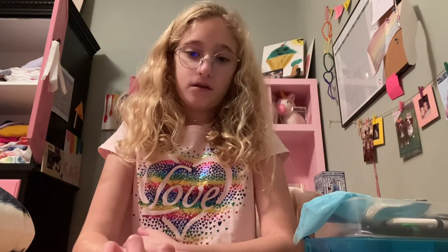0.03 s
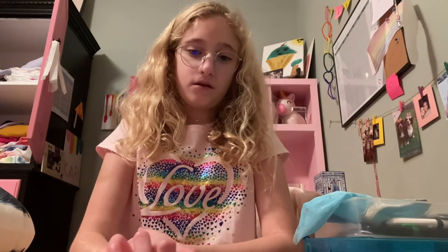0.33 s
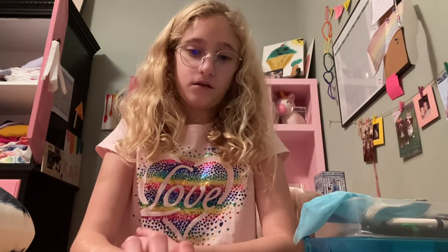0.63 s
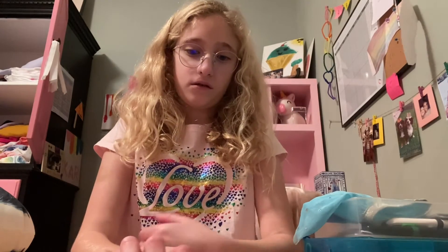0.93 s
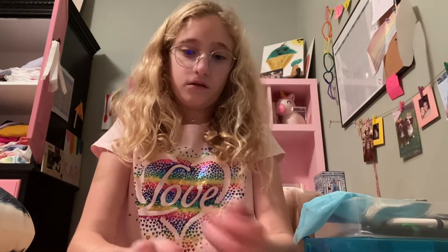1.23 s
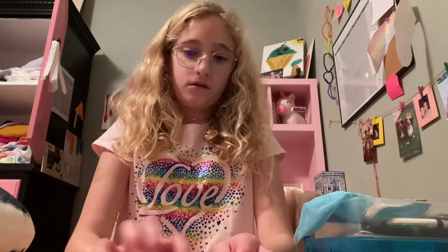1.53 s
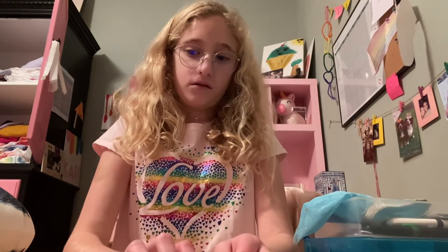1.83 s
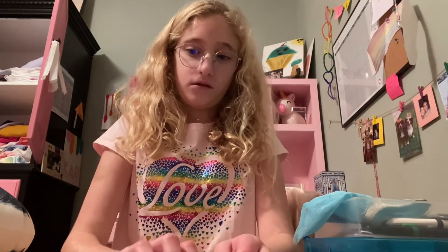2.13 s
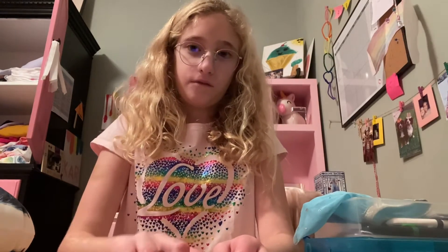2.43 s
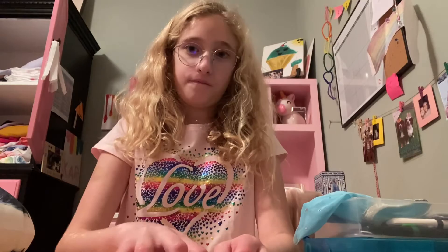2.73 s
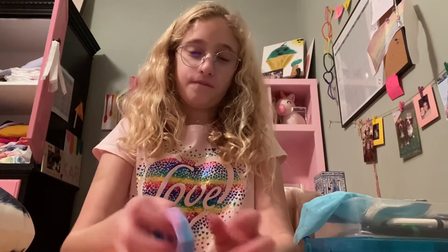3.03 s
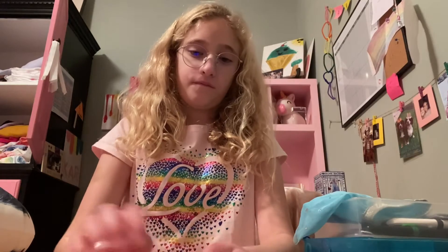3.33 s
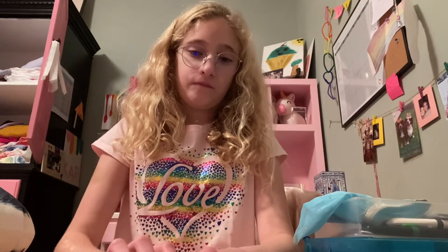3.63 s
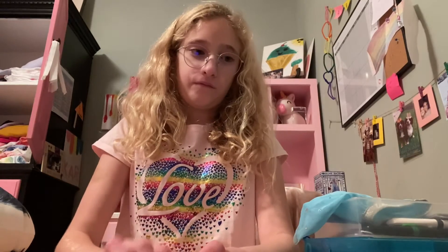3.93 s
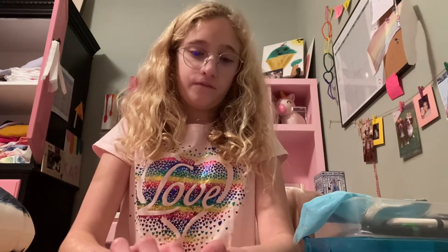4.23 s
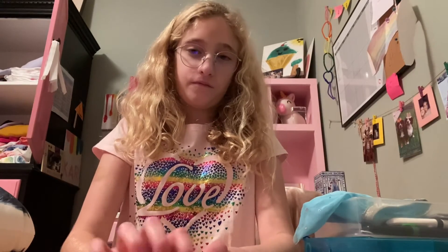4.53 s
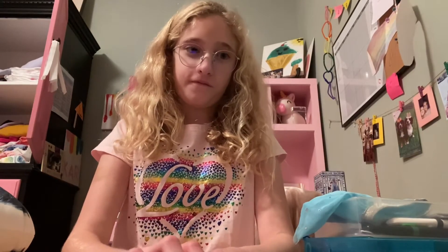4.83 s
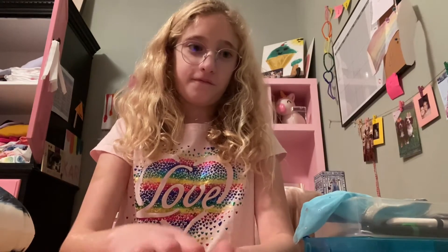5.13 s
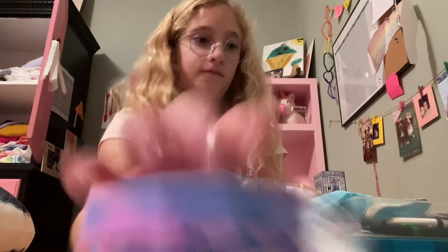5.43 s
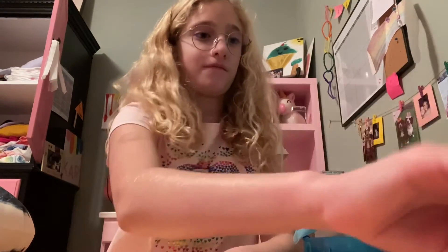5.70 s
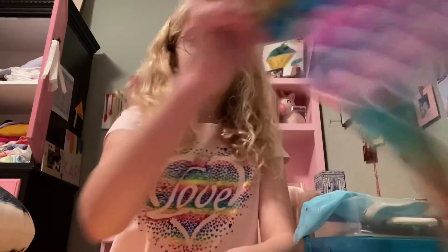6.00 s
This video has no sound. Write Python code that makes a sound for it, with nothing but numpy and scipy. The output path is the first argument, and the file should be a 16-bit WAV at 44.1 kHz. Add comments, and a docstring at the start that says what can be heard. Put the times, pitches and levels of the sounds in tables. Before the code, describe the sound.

Soft, irregular pops of a silicone bubble toy with rubbery scuffs and desk thuds, ending in sharp knocks against the microphone.

```python
"""The domes of a silicone pop toy snap through under fingers, on a desk in a small bedroom. Each flip is one
pulse with a brief ring of cup and rim. Presses pat the rubber and thud in the desk top; the tacky sheet scuffs,
ticks and creaks as it is shifted. Near the end a hand knocks against a camera on the same desk, which rings and
rattles on its stand. All is heard through the camera's two microphone ports, over faint room air."""
import sys
import numpy as np
from scipy import signal
from scipy.io import wavfile

SR = 44100
rng = np.random.default_rng(int(sys.argv[2]) if len(sys.argv) > 2 else 0)


def generate_wav(signal):
    """Clip the signal to [-1, 1] and save it as 16-bit WAV at the path in sys.argv[1]."""
    frames = np.transpose(np.atleast_2d(signal))
    scaled = np.clip(frames, -1, 1) * 32767
    pcm = np.round(scaled).astype(np.int16)
    wavfile.write(sys.argv[1], SR, pcm)


N = 267422
T = np.arange(SR // 3) / SR  # time axis of one event, s

# Spectra. Each row: frequency in Hz, relative gain in dB.
AIR_SPECTRUM = [(20, -9), (55, 4.5), (125, -9), (300, -13), (600, -16), (1300, -25), (3000, -34),
                (8000, -35.5), (16000, -41)]
SCUFF_SPECTRUM = [(200, -26.5), (500, -3), (850, 5.5), (1150, 3), (1600, -3), (2100, -3), (2550, -11),
                  (2870, -8), (3300, -8), (4500, -12), (7000, -32), (16000, -54.5)]
FIZZ_SPECTRUM = [(1500, -41.5), (4000, 3), (8000, 15), (13000, 12), (16000, -17.5)]
RUMBLE_SPECTRUM = [(20, -26), (45, -20), (75, -5), (125, 0.5), (190, -3.5), (300, 2.5), (380, -12.5),
                   (500, -8), (1200, -58.5)]
CLICK_SPECTRUM = [(100, -10), (450, -1), (800, 2.5), (2500, -0.5), (4000, 1.5), (5800, -1), (8000, -1.5),
                  (13000, -6), (16000, -11)]
SNAP_SPECTRUM = [(100, -26), (300, -10), (480, -16), (700, -0.5), (1100, 3), (1450, -2.5), (1900, 0),
                 (2700, -2.5), (3500, 1), (4400, 4.5), (5200, 1), (6200, 0.5), (9000, -14), (16000, -14)]
MIC_RESPONSE = [(20, -0.5), (60, -1), (400, -0.5), (500, -4.5), (630, 0.5), (2800, -0.5), (3250, -7),
                (4300, -2), (5600, -2.5), (7500, -1), (8150, -1.5), (9300, -3), (10500, -17.5), (11800, -1),
                (14500, -1.5), (16000, -19)]
STAND_SPECTRUM = [(200, -16), (500, -8), (800, 0), (1150, 2.5), (1600, -9.5), (3000, -9), (6000, -23),
                  (15000, -27)]
# Bedroom decay. Each row: frequency in Hz, t60 in seconds.
ROOM_DECAY = [(100, 0.33), (300, 0.094), (1000, 0.26), (2500, 0.17), (5000, 0.15), (9000, .16),
              (15000, 0.074)]
# Hand and sheet sliding. Each row: three times in seconds (once sorted: start, fastest, end),
# scuff level in dB, rumble level in dB.
SLIDE_STROKES = [(0, 0.004, 0.17, -61.5, -41.5), (0.169, 0.275, 0.3, -51.5, -61.5),
                 (0.29, 0.328, 0.37, -49, -53), (.46, 0.509, .56, -57, -57),
                 (0.554, 0.626, 0.69, -53.5, -46), (0.78, 0.963, 0.94, -64.5, -49.5),
                 (0.999, 1.041, 1.102, -45, -35), (1.188, 1.25, 1.37, -55.5, -42),
                 (1.294, 1.357, 1.517, -41.5, -42), (1.411, 1.495, 1.73, -40.5, -41),
                 (1.7, 1.79, 2, -61.5, -59), (1.858, 1.873, 2.122, -63.5, -41.5),
                 (2.13, 2.19, 2.3, -67.5, -51.5), (2.26, 2.522, 2.66, -69, -53.5),
                 (2.865, 2.937, 3.025, -56, -54), (2.962, 3.018, 3.18, -42.5, -48),
                 (3.035, 3.178, 3.39, -40.5, -40.5), (3.328, 3.377, 3.49, -53, -53.5),
                 (3.44, 3.468, 3.67, -56.5, -53.5), (3.88, 4.113, 4.14, -61.5, -67),
                 (4.375, 4.549, 4.39, -49.5, -43), (4.62, 4.713, 4.55, -52, -59.5),
                 (4.864, 5.12, 5.06, -48.5, -36), (5.11, 5.272, 5.41, -42, -45),
                 (5.58, 5.647, 12, -58.5, -59), (5.887, 5.929, 5.92, -40, -38)]
# Stretched rubber. Each row: start and end in seconds, first and last pitch in Hz, width in Hz,
# level in dB.
SHEET_CREAKS = [(1.415, 1.637, 2830, 2770, 133, -58), (2.498, 2.614, 1900, 2200, 706, -67),
                (2.889, 3.13, 2830, 2830, 200, -63.5), (3.122, 3.279, 1810, 2200, 639.7, -43.5),
                (3.206, 3.25, 8150, 8070, 122, -52.5), (3.269, 3.343, 2150, 2270, 410, -41.5),
                (4.585, 4.69, 1890, 1244, 546, -49.5), (5.188, 5.327, 1930, 1910, 650, -55)]
# Fingertip drags. Each row: start in seconds, length in seconds, pitch in Hz, level in dB.
FINGER_GROANS = [(1.265, 0.046, 319.6, -48.5), (1.864, 0.054, 284.6, -41)]
# Peeling skin and nails. Each row: start in seconds, level in dB, tilt in dB per octave.
FINGER_TICKS = [(.027, -34, -18), (.271, -48, -3), (.625, -37, -11.5), (1.2045, -33, -6.5),
                (1.3452, -26, 5.5), (1.4895, -20, -8.5), (1.568, -17, -4), (1.664, -27.5, -6),
                (2.053, -44.5, -6), (2.194, -42, -8), (2.561, -44.5, -10), (2.908, -43.5, -2.5),
                (2.9922, -31, -0.5), (3.026, -28.5, 0.5), (3.087, -26.5, -2), (3.1395, -26.5, -4.5),
                (3.243, -22, 0.5), (3.2913, -22, 1), (3.499, -34, -6), (4.0997, -41.5, -5.5),
                (4.5789, -33, 2.5), (5.044, -16.5, -3.5), (5.1641, -25.5, -3), (5.3048, -22, -1),
                (5.3672, -17, 7.5), (5.3902, -3, 6), (5.479, -26, -1.5), (5.969, -24, -6)]
# Desk top modes. Each row: frequency in Hz, level in dB, t60 in seconds.
DESK_MODES = [(66, -17, 1), (126.3, -2, 0.56), (118.7, -14, 0.24), (150, -7.5, 0.16), (250, 4.5, 0.078),
              (257.5, -9, 0.21), (275.6, -11.5, 0.54), (324.3, -5, 0.13), (399.3, -10.5, 0.086)]
# Presses and landings. Each row: start in seconds, level in dB, hardness (upper mode gain) in dB.
PRESSES = [(0.008, -31.5, -13), (0.506, -42, 0), (0.621, -44, -11), (0.862, -37.5, 0.5), (0.902, -38.5, 32),
           (0.952, -38.5, 1), (1.015, -17, -1.5), (1.044, -27, -13), (1.207, -38, -25),
           (1.224, -28.5, -3.5), (1.353, -37, -9.5), (1.493, -21.5, -1.5), (1.574, -25, 7),
           (1.666, -31, -26), (1.754, -39, 5), (2.292, -36.5, -15.5), (2.335, -31, -22), (2.37, -23.5, -7),
           (2.814, -41, -11), (3.161, -30, 8.5), (3.334, -19, 0), (3.509, -32.5, -16), (3.674, -46, -26.5),
           (3.805, -29, -5.5), (4.108, -32, -7), (4.361, -33.5, -5.5), (4.673, -23.5, 5), (4.711, -29.5, 2),
           (4.942, -19, -5), (5.047, -25.5, -7), (5.074, -27, -8.5)]
# Camera modes. Each row: frequency in Hz, level in dB, t60 in seconds, phase between ports in radians.
CASE_MODES = [(76, -11, 0.1, 2), (107, -5.5, 0.034, -0.5), (161, -3.5, 0.055, 1.55),
              (249, -7, 0.0194, -1.4), (337.5, -1, 0.061, 0.63), (404, -2, 0.033, -1.3),
              (672, -2.5, 0.038, -2), (751, -1.5, 0.035, -2), (1207, -2.5, 0.05, -3),
              (2100, 1.5, 0.011, 1.5), (2780, -3, 0.023, 1.5), (8400, -14.5, 0.046, -1.2)]
# Hand hitting the camera. Each row: start in seconds, crack level in dB, tilt in dB per octave, # crack t60 in
# seconds, case ring level in dB, low mode gain in dB.
CAMERA_KNOCKS = [(5.4971, -3.5, -0.5, 0.051, -9.5, -24), (5.5165, -1.5, 0, 0.018, -22, -26.5),
                 (5.525, -4, -5, 0.078, -3, -24.5), (5.533, -3.5, 7, 0.026, -8, -25.5),
                 (5.5396, -13.5, -7.5, 0.082, -4, 11.5), (5.545, -15, 2, 0.012, -29, -8.5),
                 (5.578, -21, 9, 0.019, -46, -6), (5.5969, -10, 4.5, 0.0058, -16, -4)]
# Dome flips. Each row: time in seconds, level in dB, treble edge in Hz, cup pitch in Hz,
# relative cup ring level in dB, relative skin smack level in dB.
DOME_POPS = [(1.0139, -27, 780, 1100, 34, -8), (1.495, -7, 890, 1040, -5.5, -15),
             (1.647, -30, 1100, 830, 9, -10), (2.29, -43, 1000, 782, 11, -21),
             (2.336, -45.5, 1090, 871, 18.5, -22.5), (2.370, -36.5, 990, 690, 6, -45),
             (3.1692, -16, 1900, 895, -10.5, -3), (3.333, -6.5, 901, 809, 0.5, -9),
             (3.8003, -4.5, 2400, 1750, 2, -36), (3.82, -15.5, 2000, 1400, -7, -19),
             (4.369, -3.5, 3720, 2676, -1.5, -17.5), (4.658, -24.5, 1470, 1020, -4, -2.5),
             (4.6743, -12, 1030, 940, -8, -8), (4.7107, -6, 3000, 2550, -3, -17),
             (4.931, -7.5, 2150, 2274, 1.5, -13.5)]


def amp(db):
    return 10 ** (np.asarray(db) / 20)


def unit_rms(x):
    return x / np.sqrt(np.mean(x ** 2) + 1e-20)


def unit_peak(x):
    return x / (abs(x).max() + 1e-20)


def unit_blow(x):
    """Scales to the energy of 1 ms at full level."""
    return x / np.sqrt((np.atleast_2d(x) ** 2).sum(1).mean() / (SR / 1000))


def lookup(points, hz):
    """Interpolates on a log-frequency axis."""
    table_hz, value = np.transpose(points)
    return np.interp(np.log(hz + 1), np.log(table_hz + 1), value)


def decay(t60_s):
    return np.exp(-np.log(1000) * T / max(t60_s, 1e-3))


def attack(rise_s):
    return 1 - np.exp(-T / rise_s)


def add(mix, start_s, sound, pan_db=0):
    """Mixes in a sound; positive pan is left."""
    part = mix[:, max(round(start_s * SR), 0):][:, :sound.shape[-1]]
    part += (sound * amp([[pan_db / 2], [-pan_db / 2]]))[:, :part.shape[1]]


def colour(x, db_of_hz, size=4096):
    """Minimum-phase filter."""
    log_gain = np.log(amp(db_of_hz(abs(np.fft.fftfreq(size, 1 / SR)))) + 1e-5)
    taps = np.fft.ifft(np.exp(np.conj(signal.hilbert(log_gain)))).real[:size // 2]
    return signal.oaconvolve(np.atleast_2d(x), taps[None], axes=1)[:, :x.shape[-1]]


def shaped(x, spectrum):
    """Applies a spectrum; rms 1."""
    return unit_rms(colour(x, lambda f: lookup(spectrum, f)))


def stereo_noise(size, spread):
    common, side = rng.standard_normal((2, size))
    return np.array([common + spread * side, common - spread * side])


def flutter(rate_hz):
    """Smooth random curve; rms 1."""
    return unit_rms(np.interp(np.arange(N) * rate_hz / SR, np.arange(N), rng.standard_normal(N)))


def delay_left(x, samples):
    return np.array([np.pad(x[0], (samples, 0))[:N], x[1]])


def crack(tilt_db_oct, t60_s, rise_s=0.00099):
    """One contact: a dying burst of tiny slips."""
    slips = stereo_noise(len(T), 0.45) * decay(t60_s) * attack(rise_s)
    gain_db = lambda f: lookup(CLICK_SPECTRUM, f) + tilt_db_oct * np.log2((f + 300) / 3000)
    return unit_peak(colour(slips, gain_db))


def bedroom(x, near_db, near_t60_s, tail_db, echoes_per_s=4000):
    """Adds quick reflections from desk and body, then a short tail from the walls."""
    taps = rng.choice([-1., 1.], (2, len(T))) * (rng.random((2, len(T))) < echoes_per_s / SR)
    taps = taps + 0.12 * taps[::-1]  # channel crossfeed
    hz, t, spectra = signal.stft(taps * (T > 0.006), SR, nperseg=256)
    fade = amp(-60 * t / lookup(ROOM_DECAY, hz)[:, None])
    tail = signal.istft(spectra * fade, SR, nperseg=256)[1][:, :len(T)]
    near = taps * decay(near_t60_s) * (T > 0.001)
    echo = amp(near_db) * near / np.linalg.norm(near[0]) + amp(tail_db) * tail / np.linalg.norm(tail[0])
    return x + signal.fftconvolve(x, echo, axes=1)[:, :N]


def room_air(level_db=-66.5):
    """Steady, bass-heavy noise of the still room."""
    return amp(level_db) * shaped(stereo_noise(N, 0.27), AIR_SPECTRUM)


def snags(rate_hz=24, jump_db=7, t60_s=0.027):
    """Friction gain: tacky rubber sticks and tears free at uneven intervals."""
    times_s = np.cumsum(rng.uniform(0.3, 1.7, 400)) / rate_hz
    jumps = np.bincount((times_s * SR).astype(int), amp(jump_db) * rng.random(len(times_s)), N)[:N]
    return 1 + signal.oaconvolve(jumps, decay(t60_s))[:N]


def sliding(scuff_db=-1, fizz_db=-54, rumble_db=-2, brisk_db=-41, grain_db=4, grains_per_s=600):
    """Rubber catches and slips in clumped grains; the hand's weight rumbles beneath."""
    t, power = np.arange(N) / SR, np.zeros((2, N))
    for *times_s, stroke_db, weight_db in SLIDE_STROKES:
        speed = np.interp(t, np.sort(times_s), [0, 1, 0]) ** 0.99
        power += amp([[stroke_db], [weight_db]]) ** 2 * speed ** 2
    scuff, rumble = np.sqrt(power)
    fizz = (scuff / amp(brisk_db)) ** 1.36  # brisk strokes are brighter
    sizes = amp(grain_db * np.minimum(rng.exponential(1, N), 4.5))
    grains = sizes * (rng.random(N) < grains_per_s / SR) * stereo_noise(N, 1)
    friction = unit_rms(grains) + 0.7 * stereo_noise(N, 0.96)
    friction *= amp(3 * flutter(90)) * snags()
    return (amp(scuff_db) * scuff * shaped(friction, SCUFF_SPECTRUM)
            + amp(fizz_db) * fizz * shaped(friction, FIZZ_SPECTRUM)
            + amp(rumble_db) * rumble * shaped(stereo_noise(N, 0.73), RUMBLE_SPECTRUM))


def creaks(stutter_db=4, stutter_hz=120):
    """Stick-slip drives one resonance of the sheet, which glides as the stretch changes."""
    out = np.zeros((2, N))
    stutter = amp(stutter_db * flutter(stutter_hz))
    for start_s, end_s, first_hz, last_hz, width_hz, db in SHEET_CREAKS:
        size = round((end_s - start_s) * SR)
        carrier = np.exp(2j * np.pi * np.cumsum(np.linspace(first_hz, last_hz, size)) / SR)
        pole = np.exp(-np.pi * width_hz / SR)
        slips = stereo_noise(SR, 1)[:, :size]
        ring = signal.lfilter([1], [1, -2 * pole, pole ** 2], slips / carrier) * carrier
        add(out, start_s, amp(db) * unit_rms(ring.real) * signal.windows.tukey(size, 0.5))
    return out * stutter


def groans():
    """A fingertip drags on the rubber: a short low tone."""
    out = np.zeros((2, N))
    for start_s, length_s, hz, db in FINGER_GROANS:
        t = T[T < length_s]
        tone = np.sin(2 * np.pi * hz * t) * signal.windows.tukey(len(t), 0.4)
        add(out, start_s, amp(db) * unit_rms(tone))
    return out


def ticks(soft_t60_s=0.044, hard_db_oct=-3, halving_db_oct=2.5):
    """Skin peels off and nails catch; harder contacts are brighter and briefer."""
    out = np.zeros((2, N))
    for start_s, db, tilt_db_oct in FINGER_TICKS:
        halvings = max(tilt_db_oct - hard_db_oct, 0) / halving_db_oct
        add(out, start_s, amp(db) * crack(tilt_db_oct, soft_t60_s * 0.5 ** halvings))
    return out


def pats(gain_db=-9):
    """Skin meets rubber at each press: a dull pat, louder on a hard landing."""
    out = np.zeros((2, N))
    for start_s, db, hard_db in PRESSES:
        add(out, start_s, amp(db + gain_db + 0.3 * hard_db) * crack(tilt_db_oct=-10, t60_s=0.021))
    return out


def desk_thuds(gain_db=-1, upper_db=3, pad_db=-16, rise_s=0.0066, settle_s=0.08):
    """A fingertip bottoms out on the desk; hard landings wake upper modes, the settling hand damps."""
    out = np.zeros((2, N))
    envelope = attack(rise_s) * np.exp(-(T / settle_s) ** 3)
    for start_s, db, hard_db in PRESSES:
        detunes = 1 + 0.018 * rng.standard_normal(len(DESK_MODES))
        ring = np.zeros(len(T))
        for (hz, mode_db, t60_s), detune in zip(DESK_MODES, detunes):
            gain = amp(mode_db + (hard_db + upper_db) * (hz > 200))
            ring += gain * np.sin(2 * np.pi * hz * detune * T) * decay(t60_s)
        pad = shaped(stereo_noise(len(T), 0.18), RUMBLE_SPECTRUM) * decay(0.21)
        thud = (unit_peak(ring) + amp(pad_db) * pad) * envelope
        add(out, start_s, amp(db + gain_db) * unit_peak(thud), pan_db=-1)
    return out


def stand_rattle(start_s=5.646, period_s=0.0302, shrink=0.99, first_db=-30, fall_db=0.6, dull_db_oct=3.1):
    """The camera rocks on its stand, each tap sooner, weaker and duller."""
    out = np.zeros((2, N))
    for k in range(16):
        tap = stereo_noise(len(T), 0.87) * decay(0.073) * attack(0.0046)
        tap = colour(tap, lambda f: lookup(STAND_SPECTRUM, f) - dull_db_oct * k * np.log2(1 + f / 2000))
        add(out, start_s, amp(first_db - fall_db * k) * unit_peak(tap), pan_db=-2)
        start_s += period_s * shrink ** k
    return out


def case_ring(rise_s=0.00052):
    """Knocks ring the camera's case; each mode reaches the two ports with its own phase offset."""
    out = np.zeros((2, N))
    for start_s, *_, ring_db, low_db in CAMERA_KNOCKS:
        ring = np.zeros((2, len(T)))
        for hz, mode_db, t60_s, phase_rad in CASE_MODES:
            mode = np.sin(2 * np.pi * hz * T + np.array([[phase_rad], [0]]))
            ring += amp(mode_db + low_db * (hz < 500)) * decay(t60_s) * mode
        add(out, start_s, amp(ring_db) * unit_peak(ring * attack(rise_s)), pan_db=-3)
    return out


def knocks():
    """The hand strikes and scrapes the camera: sharp cracks."""
    out = np.zeros((2, N))
    for start_s, db, tilt_db_oct, t60_s, *_ in CAMERA_KNOCKS:
        add(out, start_s, amp(db) * crack(tilt_db_oct, t60_s))
    return out


def dome_pops(gain_db=-3, strain_db=-21, strain_s=0.0013, shiver_db=-28, shiver_t60_s=0.014, rim_hz=4550):
    """A dome strains, then flips in one pulse; cup air and taut rim ring, the wall shivers, skin smacks."""
    out, lead = np.zeros((2, N)), SR // 200
    strain = amp(strain_db) * np.exp(-T[:lead][::-1] / strain_s)
    shiver = amp(shiver_db) * decay(shiver_t60_s)

    def ring(hz, t60_s):
        tone = np.sin(2 * np.pi * hz * T) * decay(t60_s) * attack(0.00023)
        return unit_blow(np.pad(tone, (lead, 0)))

    for flip_s, db, edge_hz, cup_hz, cup_db, smack_db in DOME_POPS:
        # A faster flip is brighter; a smaller cup rings more briefly and radiates less bass.
        band_db = lambda f: -10 * np.log10((1 + (f / edge_hz) ** 4) * (1 + (cup_hz / 2 / (f + 20)) ** 2))
        push = stereo_noise(lead + len(T), 0.4) * np.append(strain, shiver)
        push[:, lead] += 1  # the flip
        snap = unit_blow(colour(push, lambda f: lookup(SNAP_SPECTRUM, f) + band_db(f)))
        cup = amp(cup_db) * ring(cup_hz, t60_s=0.0062 * (cup_hz / 1000) ** -0.2)
        rim = amp(band_db(rim_hz)) * ring(rim_hz, t60_s=0.006)
        add(out, flip_s - lead / SR, amp(db + gain_db) * unit_blow(snap + cup + rim))
        add(out, flip_s - 0.001, amp(db + smack_db) * crack(tilt_db_oct=-5, t60_s=0.042))
    return out


def scene():
    """Toy, camera and room air; toy and camera contacts reach the right port first."""
    toy = bedroom(dome_pops(), near_db=-4, near_t60_s=0.02, tail_db=-14)
    toy += bedroom(ticks() + pats(), near_db=-14, near_t60_s=0.016, tail_db=-15.5)
    toy += bedroom(sliding() + creaks(), near_db=-3.5, near_t60_s=0.03, tail_db=-20)
    toy += bedroom(desk_thuds() + groans(), near_db=-16, near_t60_s=0.014, tail_db=-18.5)
    contacts = delay_left(knocks() + stand_rattle(), samples=22)
    camera = bedroom(contacts + case_ring(), near_db=-9, near_t60_s=0.013, tail_db=-14.5)
    return delay_left(toy, samples=4) + camera + room_air()


def record(dry, low_hz=54, high_hz=16300):
    """Microphone response, bass cut, band limit."""
    heard = colour(dry, lambda f: lookup(MIC_RESPONSE, f))
    heard = signal.sosfilt(signal.butter(4, low_hz, "high", fs=SR, output="sos"), heard)
    lowpass = signal.firwin(511, high_hz, window=("kaiser", 9), fs=SR)
    return signal.oaconvolve(heard, lowpass[None], "same")


dry = scene()
out = record(dry)
generate_wav(out)
```